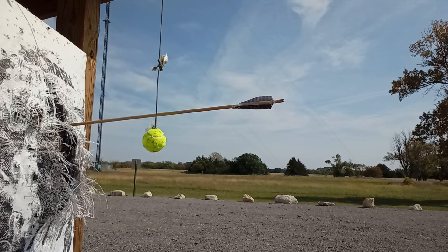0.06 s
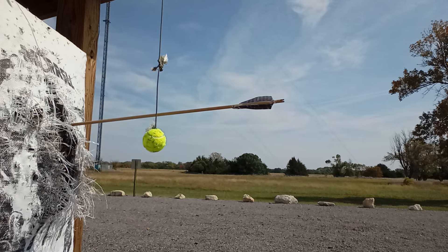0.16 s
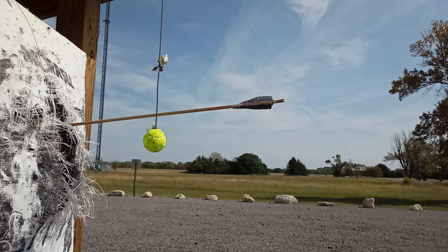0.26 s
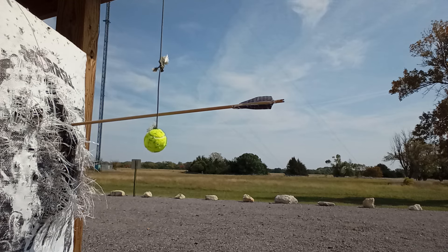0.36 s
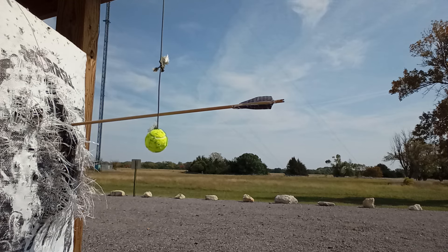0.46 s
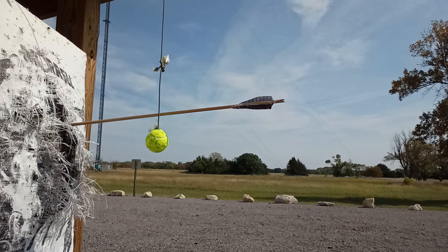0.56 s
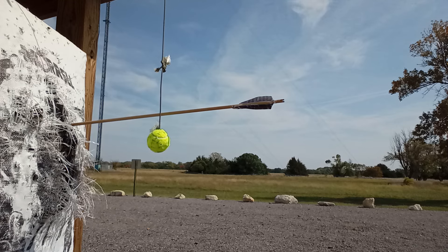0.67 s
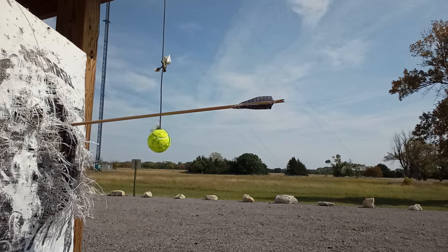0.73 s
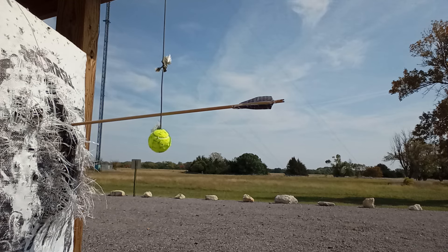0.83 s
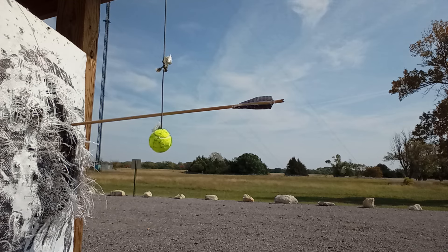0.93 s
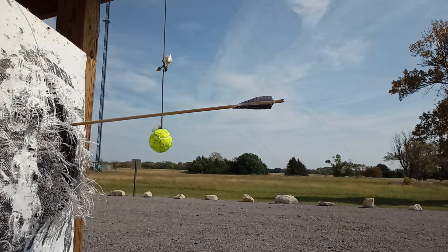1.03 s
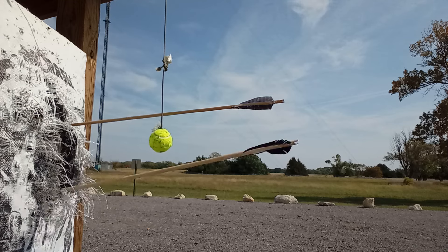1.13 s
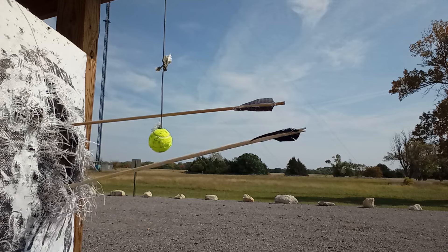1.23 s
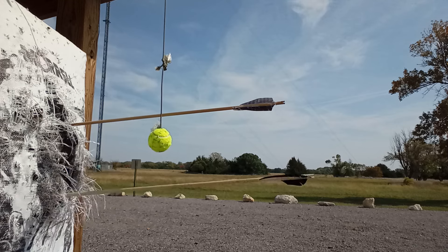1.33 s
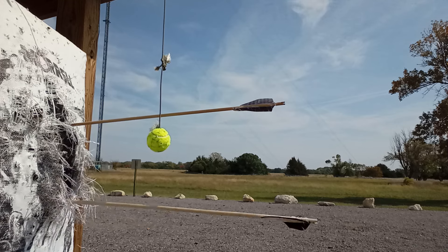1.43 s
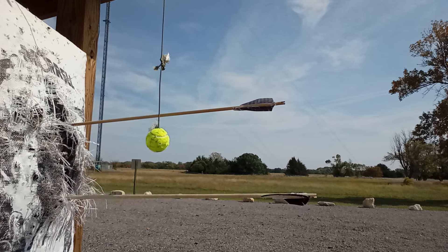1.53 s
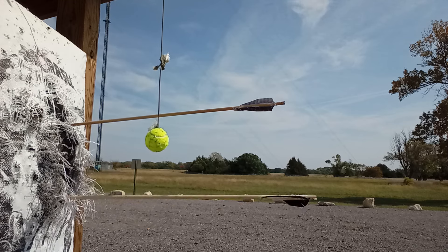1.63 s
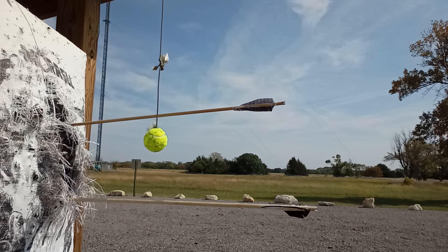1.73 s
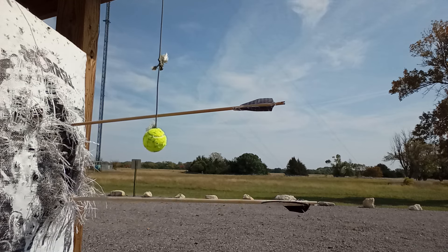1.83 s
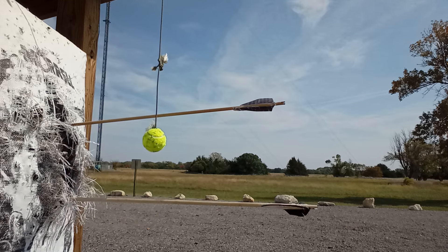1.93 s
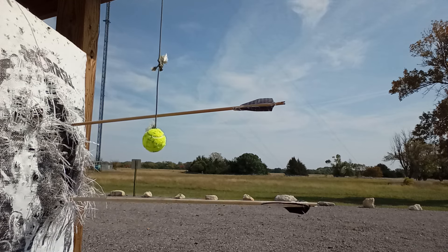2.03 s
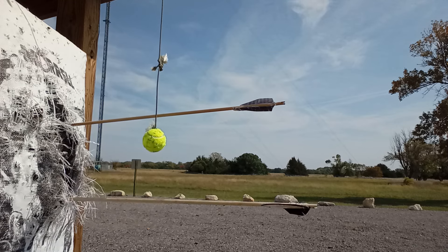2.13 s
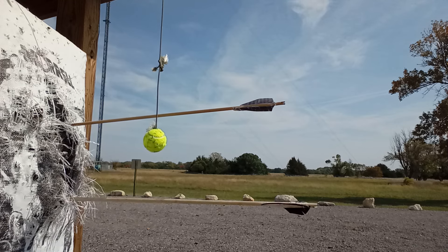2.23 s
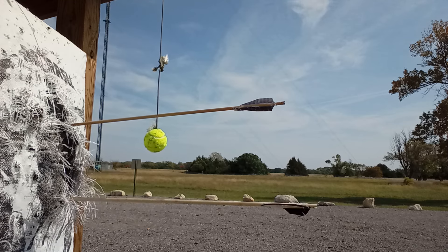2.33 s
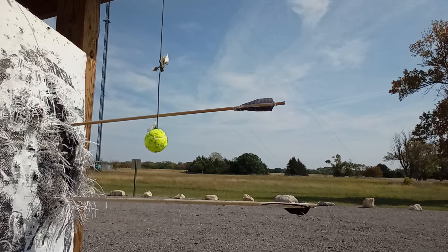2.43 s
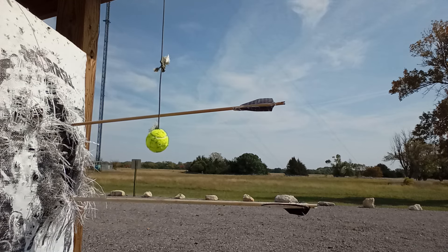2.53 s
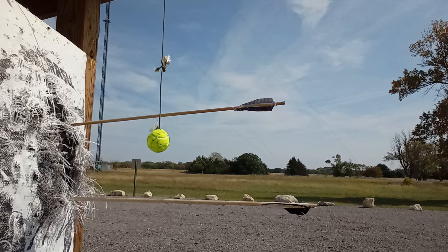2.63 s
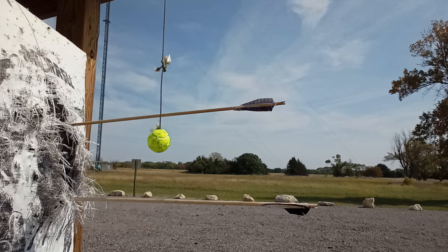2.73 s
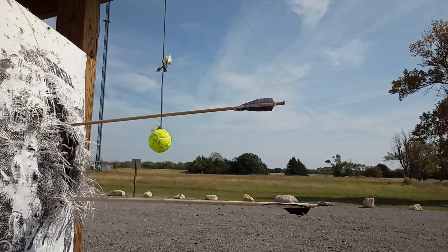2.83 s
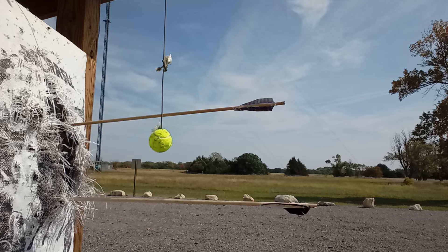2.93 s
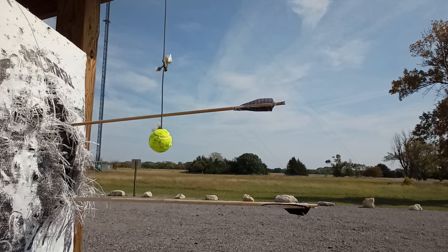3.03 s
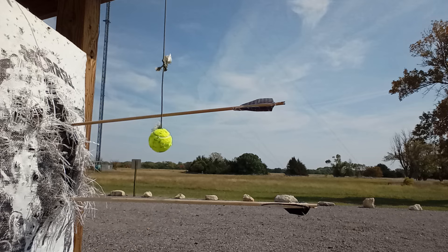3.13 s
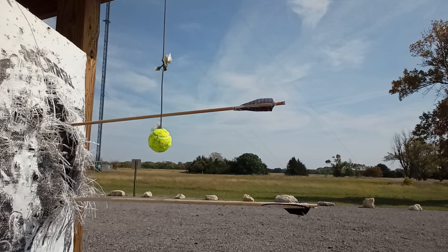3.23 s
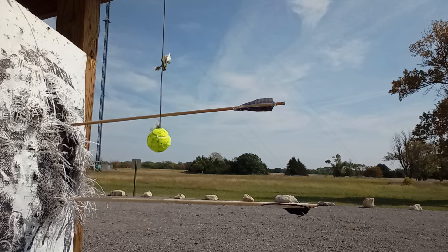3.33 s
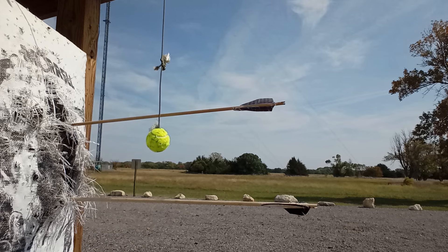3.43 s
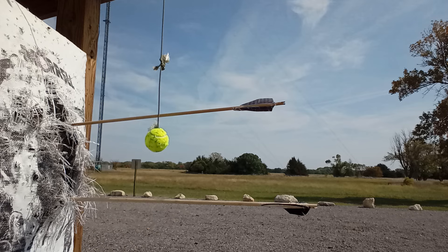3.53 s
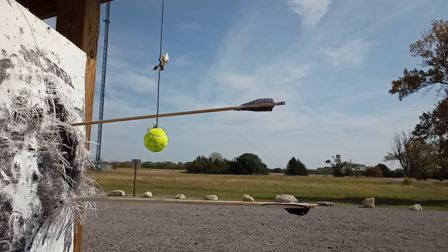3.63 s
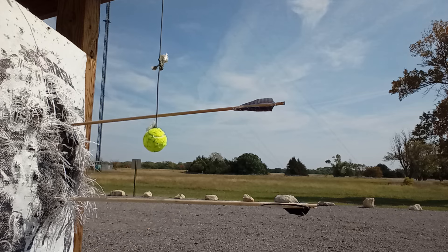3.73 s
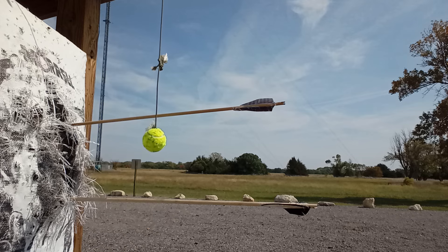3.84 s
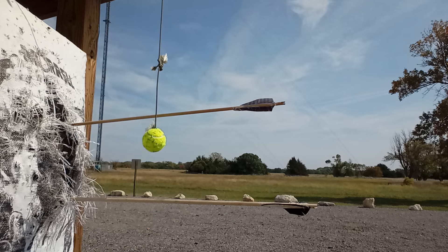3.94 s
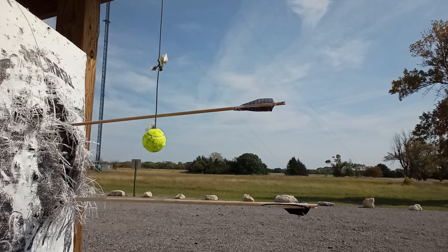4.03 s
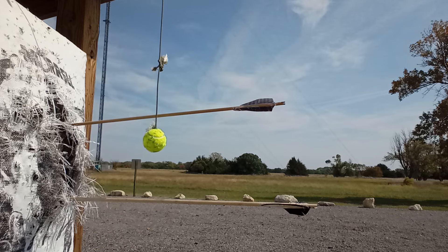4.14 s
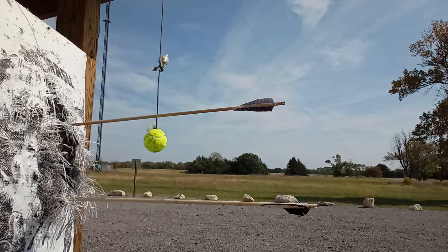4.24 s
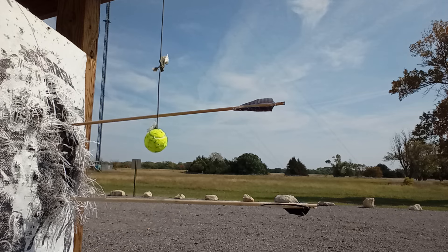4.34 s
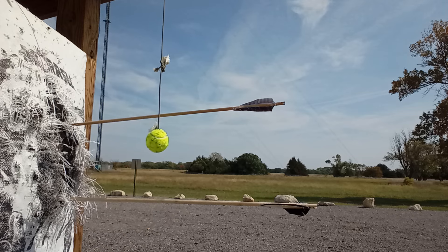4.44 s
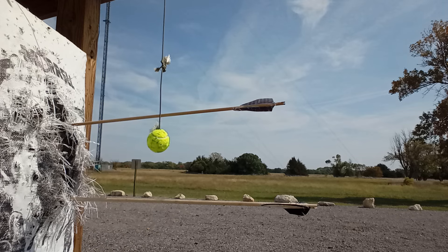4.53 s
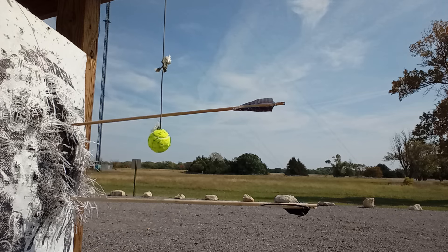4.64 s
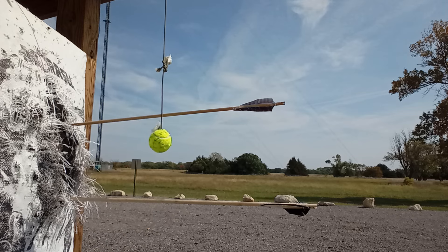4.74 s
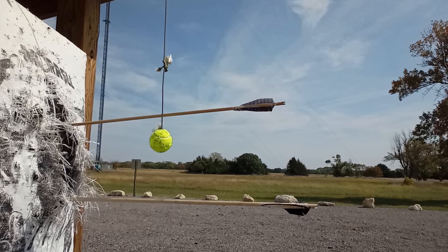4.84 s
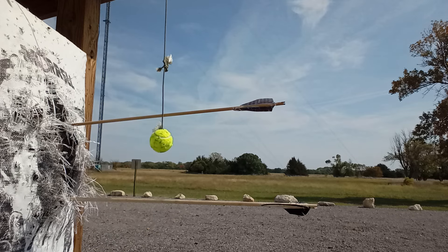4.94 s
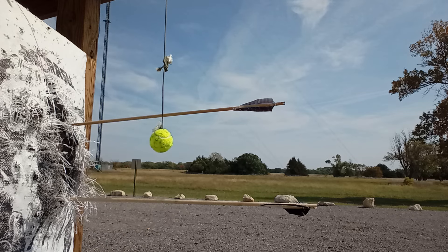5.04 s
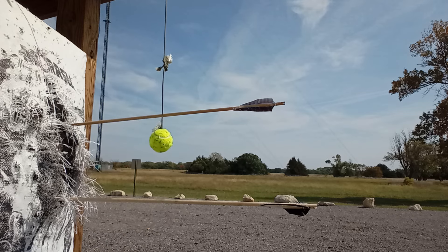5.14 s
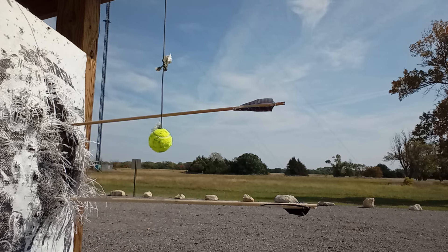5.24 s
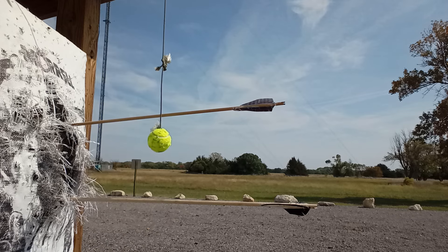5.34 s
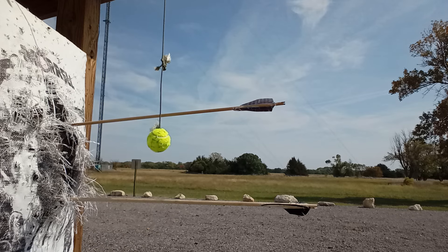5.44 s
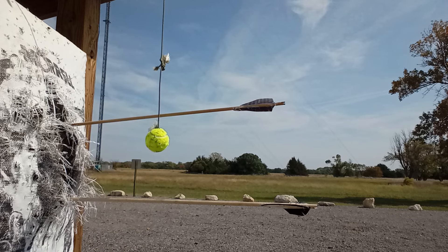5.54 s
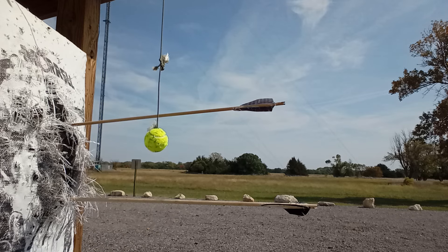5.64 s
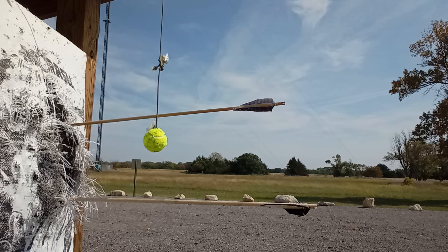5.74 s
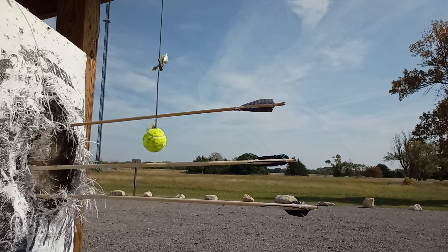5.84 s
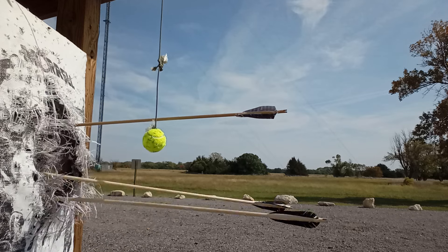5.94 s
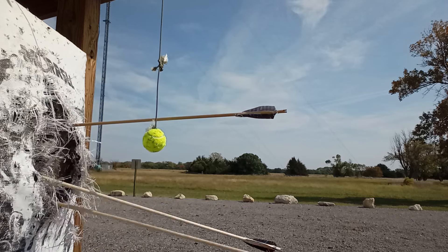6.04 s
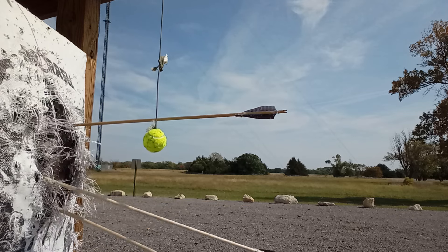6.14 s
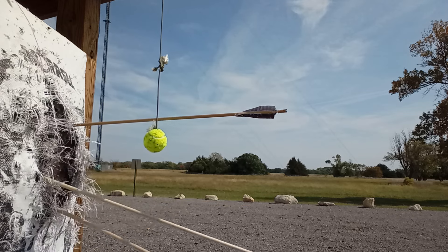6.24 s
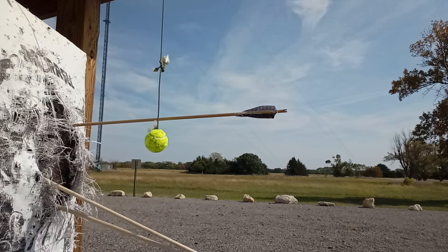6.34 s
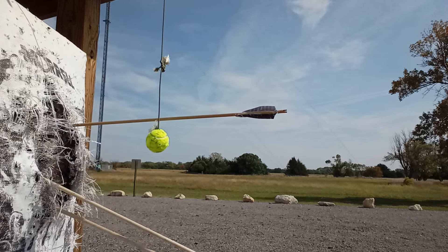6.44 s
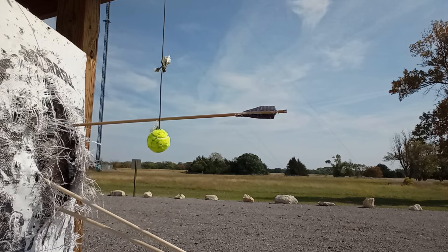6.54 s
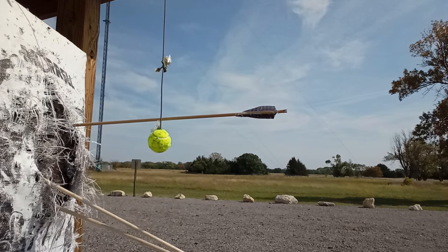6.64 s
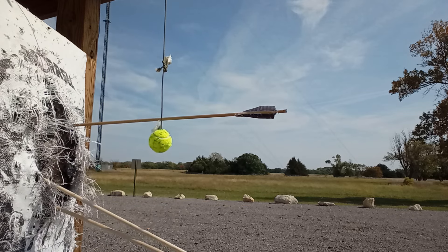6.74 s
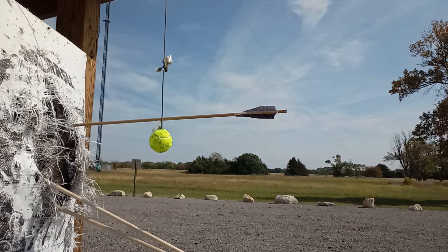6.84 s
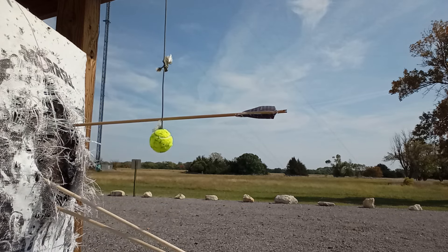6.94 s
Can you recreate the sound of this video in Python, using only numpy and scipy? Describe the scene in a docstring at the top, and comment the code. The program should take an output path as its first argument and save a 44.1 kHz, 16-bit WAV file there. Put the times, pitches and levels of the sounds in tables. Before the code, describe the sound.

A quiet open field with a low wavering aircraft drone, faint traffic and small birds whistling far off. A bowstring snaps at right; a quarter second later its arrow punches through fibres at left with a tight, dry thwack. After several calm seconds, marked only by a faint distant tap, another shot slaps, hisses and strikes louder and deeper, leaving a short woody rumble and light fibrous rustling. Two spaced microphones sit near the target.

```python
"""An open-air archery range, heard from beside the target by two spaced capsules.
Throughout, a receding propeller plane drones as tones on its blade rate, far traffic and the capsules' own hiss run
as banded noise and small birds call in gliding tones. Near 1 s a bow on the right slaps in ringing modes and noise,
the arrow hisses in, tears the face on the left and thuds into the bale, whose modes and fibres answer. Near 2.8 s
comes a small far knock, near 5.7 s a second shot, after which the torn fibres rub on."""
import sys
import numpy as np
from scipy import signal
from scipy.fft import rfft, irfft
from scipy.io import wavfile
from scipy.ndimage import uniform_filter1d

SR = 44100
rng = np.random.default_rng(int(sys.argv[2]) if len(sys.argv) > 2 else 0)


def unload_wav(signal):
    """Save mono or channel-first audio to the path in sys.argv[1] as 16-bit WAV at rate SR, clipped to [-1, 1]."""
    wavfile.write(
        sys.argv[1],
        SR,
        np.round(np.clip(np.atleast_2d(signal).T, -1, 1) * 32767).astype(np.int16),
    )


N = 307818

RIGHT_LAG, LEFT_LAG = 22, -12   # samples by which the left capsule hears each side later
# Housing shade for sound from the left. Each row: frequency in Hz, left minus right in dB.
SHADE_LEFT = [(700, 3), (2500, 0.5), (4000, -1), (6000, 2), (8500, 1), (12000, 3.5), (15500, 7.5)]
# Spectrum of rustling fibres, also of the knock's rasp. Each row: frequency in Hz, relative dB per Hz.
RUSTLE_COLOUR = [(500, 6.5), (1500, -10.5), (5000, -1), (7000, -8.5), (9000, -7), (16000, -16)]


def from_db(db):
    """Gain of a level."""
    return 10 ** (np.asarray(db) / 20)


def rms_one(x):
    """Scaled to unit rms."""
    return x / np.sqrt(np.mean(x ** 2) + 1e-20)


def in_time(rows):
    """Columns of a curve at every sample."""
    s, *columns = np.transpose(rows)
    return [np.interp(np.arange(N) / SR, s, c) for c in columns]


def level(rows):
    """Gain of a curve's last column, silent outside its span."""
    columns = np.transpose(rows)
    return from_db(np.interp(np.arange(N) / SR, columns[0], columns[-1], left=-200, right=-200))


def at_hz(points, hz):
    """Read a table on a log-frequency axis."""
    table_hz, value = np.array(points).T
    return np.interp(np.log(hz), np.log(table_hz), value)


def drift(rate_hz):
    """Random curve of rms 1: noise at SR / 40 through a double pole at rate_hz."""
    step = 40
    r = np.exp(-2 * np.pi * rate_hz * step / SR)
    white = rng.standard_normal(N // step + 2002)
    slow = rms_one(signal.lfilter([1], [1, -2 * r, r * r], white)[2000:])   # settled part
    return np.interp(np.arange(N) / step, np.arange(len(slow)), slow)


def decay(t60_s):
    """Factor per sample of a 60 dB fall in t60_s."""
    return from_db(-60 / (t60_s * SR))


def ring(push, hz, t60_s):
    """Damped mode: a unit click sets a cosine of height 1 ringing."""
    r, c = decay(t60_s), np.cos(2 * np.pi * hz / SR)
    return signal.lfilter([1, -r * c], [1, -2 * r * c, r * r], push + 1e-18)


def noise_hz():
    """Frequencies of the N-sample spectrum, kept above zero for the log axis."""
    return np.maximum(np.fft.rfftfreq(N, 1 / SR), 1)


def colour(x, spectrum):
    """Give white noise of rms 1 a spectrum, rms kept."""
    gain = from_db(at_hz(spectrum, noise_hz()))
    return irfft(rfft(x) * rms_one(gain), N)


def placed(x, lag, pan_db=0):
    """Two spaced capsules hear one source at different moments; pan_db is left minus right."""
    pair = np.array([np.roll(x, max(lag, 0)), np.roll(x, max(-lag, 0))])
    return pair * from_db([[pan_db / 2], [-pan_db / 2]])


def hiss(spectrum, lag, diffuse):
    """Coloured noise from one side, a share of its power independent per capsule, with the housing's shade."""
    # Housing shade for sound from the right. Each row: frequency in Hz, left minus right in dB.
    shade_right = [(700, 1.5), (1500, -1), (4000, -4.5), (8000, -6), (12000, -6.5), (15500, -10.5)]
    direct, *apart = rng.standard_normal((3, N))
    share = np.clip(diffuse, 0, 1)
    shade_db = at_hz(shade_right if lag > 0 else SHADE_LEFT, noise_hz())
    mixed = np.sqrt(1 - share) * placed(direct, lag) + np.sqrt(share) * np.array(apart)
    return irfft(rfft(colour(mixed, spectrum)) * from_db([shade_db / 2, -shade_db / 2]), N)


def bursts(events, t60_s):
    """Envelope of sudden starts that die exponentially."""
    starts = np.zeros(N)
    for s, db, *_ in events:
        starts[round(s * SR)] = from_db(db)
    return signal.lfilter([1], [1, -decay(t60_s)], starts + 1e-18)


def onrush(start, full, stop, db, t60_s):
    """Envelope that climbs ever faster, holds and dies."""
    t = np.arange(N) / SR
    rise = np.clip((t - start) / (full - start), 1e-9, 1)
    fall_db = 60.0 * np.clip(t - stop, 0, 1) / t60_s
    return (t > start) * from_db(db - 38 * (1 - rise ** 3.8) - fall_db)


def soft_push(ms):
    """A rounded push of unit area, centred 5 ms into half a second."""
    t = (np.arange(SR // 2) / SR - .005) * 1000 / ms
    push = (np.abs(t) < .5) * np.cos(np.pi * t) ** 2
    return push / push.sum()


def bow():
    """String slaps make clicks with rasps and strike low limb, riser and high modes; one echo follows."""
    # Slaps on the limbs. Each row: start in seconds, click onset level in dB, then limb, riser ring, rasp
    # and high ring, each in relative dB.
    slaps = [(0.9546, -53.5, -48.5, -61, -56, -53), (0.972, -39, -57, -52, -49, -55),
             (0.9766, -47, -50, -57, -51, -47.5), (0.9904, -45.5, -46.5, -55, -61, -60),
             (0.996, -58.5, -56, -62, -62, -64), (1.013, -64.5, -56, -56, -59, -66),
             (5.648, -69, -62, -70, -57, -63), (5.6673, -58, -59.5, -66, -52, -55),
             (5.6854, -43, -49, -68, -45, -45), (5.691, -50, -53, -71, -58, -47),
             (5.704, -52.5, -57.5, -57, -61, -62), (5.714, -58.5, -53.5, -64, -70, -66)]
    # Bow modes. Each row: frequency in Hz, relative level in dB, t60 in seconds.
    modes = [(264, -3.5, 0.11), (540, -15, 0.096), (686, -10, 0.046), (860, -11, .05), (1736, -3, 0.091),
             (1820, -12, .04), (2770, -13.5, 0.03), (3810, -5, .035), (4280, -2, 0.024), (4560, -3, 0.025),
             (5800, -7.5, .03)]
    # Click spectrum. Each row: frequency in Hz, relative dB per Hz.
    snap_colour = [(1500, -20), (4000, 4.5), (8000, 1), (12000, 3), (16000, -10)]
    # Rasp spectrum. Each row: frequency in Hz, relative dB per Hz.
    rasp_colour = [(2000, -12), (3200, -1), (3900, 0), (4600, 1), (6000, -6), (7500, -20), (12000, -40)]
    rasp_rise_s, rasp_t60_s = 0.004, 0.02
    shudder_db, shudder_t60_s = -33.5, 0.18   # the limbs shudder on, against the snap
    echo_s, echo_snap_db, echo_body_db = .065, -7, -10
    echo_low_cut_hz, echo_high_cut_hz = 9500, 900   # snaps return thinner, limbs duller

    shudder = from_db(shudder_db) * bursts(slaps, shudder_t60_s)
    at = [round(row[0] * SR) for row in slaps]
    body = np.zeros(N)
    for hz, db, t60_s in modes:
        column = 2 if hz < 1200 else 3 if hz < 2200 else 5
        spread_db = rng.normal(0, 1.5 if hz < 2200 else 4, len(at))
        clicks = np.zeros(N)
        clicks[at] = from_db(np.array(slaps)[:, column] + db + spread_db)
        if hz < 1200:
            clicks += from_db(db) * shudder * rng.standard_normal(N)
        contact = signal.windows.hann(round(SR / hz) + 3)   # a soft touch, about one period long
        push = signal.fftconvolve(clicks, 4 * contact / contact.sum())[:N]
        body += ring(push, hz, t60_s)

    snaps = bursts(slaps, 0.0058) * hiss(snap_colour, RIGHT_LAG, diffuse=0.37)
    rise = np.exp(-1 / (rasp_rise_s * SR))
    rasp = bursts([(row[0], row[4]) for row in slaps], rasp_t60_s)
    scrape = signal.lfilter([1 - rise], [1, -rise], rasp)
    snaps += 2 * scrape * from_db(1.23 * drift(180)) * hiss(rasp_colour, RIGHT_LAG, diffuse=0.74)

    thin = signal.lfilter(*signal.butter(1, echo_low_cut_hz, "high", fs=SR), snaps)
    dull = signal.lfilter(*signal.butter(2, echo_high_cut_hz, fs=SR), body)
    echo = from_db(echo_body_db) * placed(dull, RIGHT_LAG) + from_db(echo_snap_db) * thin
    return placed(body, RIGHT_LAG, pan_db=1.5) + snaps + np.roll(echo, round(echo_s * SR), axis=1)


def flight():
    """Air tears past the feathers: hiss swells to a peak at the loose, fades, grows again as the arrow nears."""
    # Each row: loudest moment of the hiss at the loose in seconds, arrival in seconds, hiss at the loose
    # and on arrival in relative dB.
    flights = [(0.962, 1.192, -58, -59.5), (5.684, 5.884, -55.5, -61.5)]
    # Hiss spectrum. Each row: frequency in Hz, relative dB per Hz.
    air_colour = [(400, -2.5), (2000, 0), (4500, 2), (8000, -4.5), (12000, -8), (16000, -8)]
    draw_s, far_db = .026, -66.5   # lead before the peak, floor after it
    swell_db_per_s, fade_db_per_s, near_db_per_s = 700, 352, 76
    ticks_per_s, tick_db, tick_t60_s = 34, 1.5, .015   # the feathers flick now and then

    t, envelope = np.arange(N) / SR, np.zeros(N)
    for peak, arrival, loose_db, near_db in flights:
        slope = np.where(t < peak, swell_db_per_s, fade_db_per_s)
        loose = loose_db - slope * np.abs(t - peak)
        near = near_db - near_db_per_s * np.abs(arrival - t)
        floor = np.where(t > peak, far_db, -200)
        audible = (t > peak - draw_s) * (t < arrival)
        envelope += audible * from_db(np.maximum(np.maximum(loose, near), floor))
    ticks = (rng.random(N) < ticks_per_s / SR) * from_db(tick_db) * rng.random(N)
    flicks = signal.lfilter([1], [1, -decay(tick_t60_s)], ticks)
    flutter = from_db(2.48 * drift(83)) + flicks
    return envelope * flutter * hiss(air_colour, RIGHT_LAG, diffuse=.45)


def tear():
    """Fibres break ever faster under the point until it stops; feathers and shaft hiss through them."""
    # Point tearing the face. Each row: start, full and stop in seconds, level in dB, t60 in seconds,
    # relative level of the dull part in dB.
    tears = [(1.183, 1.1900, 1.1958, -32.5, 0.025, -4), (5.882, 5.893, 5.896, -26, 0.034, 1)]
    # Feathers and shaft in the loose fibres. Each row: start, full and stop in seconds, level in dB,
    # t60 in seconds.
    sizzles = [(1.186, 1.1892, 1.1945, -34, 0.014), (5.885, 5.892, 5.899, -36, .03)]
    # Bright, dull and sizzle spectra. Each row: frequency in Hz, relative dB per Hz.
    bright_colour = [(1500, -2.5), (2400, -5), (3600, 0), (4400, -1.5), (5300, -3.5), (7000, -8),
                     (8500, -13.5), (12000, -12.5), (16000, -20.5)]
    dull_colour = [(300, -16), (600, -4.5), (1000, 4), (1400, 0), (2400, 0), (3500, -18)]
    sizzle_colour = [(6000, -30), (9500, -13), (12000, -6.5), (14000, -1), (16000, -0.5)]

    bright = sum(onrush(*row[:5]) for row in tears)
    dull = sum(onrush(*row[:5]) * from_db(row[5] - 5.5) for row in tears)
    top = sum(onrush(*row) for row in sizzles)
    noise = bright * hiss(bright_colour, LEFT_LAG, diffuse=0.73)
    noise += dull * hiss(dull_colour, LEFT_LAG, diffuse=0.23)
    noise += top * hiss(sizzle_colour, LEFT_LAG, diffuse=0.57)
    return from_db(2.1 * drift(300)) * noise


def cracks():
    """Single strands of the face snap with a short ring; the touch lasts under one period."""
    # Each row: time in seconds, relative level in dB, pitch in Hz, t60 in seconds.
    strands = [(1.187, -38.5, 15000, .006), (1.1903, -20, 3920, .008), (1.191, -31, 1760, .015),
               (1.1922, -23, 4200, .007), (1.1924, -28, 14300, .003), (1.1948, -19.5, 3330, .01),
               (1.1948, -29, 1900, .012), (1.1986, -31, 3900, .007), (5.8924, -23, 3840, .006),
               (5.8934, -13, 3700, .006), (5.8934, -22, 2400, .012), (5.8954, -20, 1680, .012),
               (5.898, -23, 4250, .008)]
    out = np.zeros((2, N))
    for s, db, hz, t60_s in strands:
        snap = np.zeros(N)
        touch = soft_push(750 / hz)   # 3/4 period
        snap[round((s - .005) * SR):][:SR // 2] = from_db(db) * ring(touch, hz, t60_s)
        out += placed(snap, LEFT_LAG, at_hz(SHADE_LEFT, hz))
    return out


def thud():
    """A soft push rings the bale's modes, another the shaft's; the small face radiates no deep bass."""
    # Jolts that brake the shaft. Each row: time in seconds, direction as a sign, relative level in dB, pitch
    # in Hz, t60 in seconds, overtone tilt in dB per octave, contact in ms, relative shaft level in dB,
    # shaft t60 in seconds.
    jolts = [(1.1909, -1, -30, 298, 0.016, -14, 1.4, -51.5, .014),
             (1.1927, 1, -21.5, 222, 0.022, 0, 1.6, -23, .012),
             (1.1965, 1, -17.5, 255, 0.024, 5, 1.4, -18, .014),
             (1.2003, 1, -32, 310, .025, 6, 1.4, -24, .016),
             (1.2067, 1, -34, 289.7, .025, -4, 1.8, -43, .025),
             (5.8945, -1, -21.5, 283, 0.017, -5, 2.1, -21.5, .01),
             (5.8964, 1, -6.5, 206, 0.026, 0.5, 2.5, -13, .011),
             (5.901, 1, -14, 201, 0.016, 3, 1.87, -23, .02),
             (5.9084, -1, -25, 173, 0.072, -0.5, 2.5, -41, .03)]
    # Bale modes, on a pitch of its own each time. Each row: pitch ratio, relative level in dB, t60 ratio.
    bale_modes = [(.66, -19, 2.4), (1, 7, 0.79), (1.7, -15, 1.8), (2.05, -8.5, 0.67)]
    # Shaft modes, fixed. Each row: frequency in Hz, relative level in dB, t60 ratio.
    shaft_modes = [(815, -6, 1.1), (1040, -3.5, .95), (1298, -8, 0.6)]
    shaft_contact_ms, shaft_lag, shaft_pan_db = .95, -14, 1.5

    bale, shaft = np.zeros((2, N))
    for s, direction, db, hz, t60_s, tilt_db, ms, shaft_db, shaft_t60_s in jolts:
        start = round((s - .005) * SR)
        at = slice(start, start + SR // 2)
        sign = np.sign(direction)
        for ratio, mode_db, life in bale_modes:
            gain = from_db(db + mode_db + tilt_db * np.log2(max(ratio, 1)))
            bale[at] += sign * gain * ring(soft_push(ms), hz * ratio, t60_s * life)
        for mode_hz, mode_db, life in shaft_modes:
            gain = from_db(shaft_db + mode_db)
            shaft[at] += sign * gain * ring(soft_push(shaft_contact_ms), mode_hz, shaft_t60_s * life)
    both = placed(bale, LEFT_LAG - 2, pan_db=0.5) + placed(shaft, shaft_lag, shaft_pan_db)
    return signal.lfilter(*signal.butter(3, 80, "high", fs=SR), both)


def frame():
    """The wooden frame rumbles on: dull noise that dies away after each hit."""
    # Each row: start in seconds, level in dB, t60 in seconds.
    rumbles = [(1.2, -50.5, 0.1), (1.25, -57, 0.5), (5.907, -42.5, .12), (5.955, -51.5, 0.34)]
    # Rumble spectrum. Each row: frequency in Hz, relative dB per Hz.
    rumble_colour = [(120, -14.5), (250, 4.5), (450, 1), (800, -12), (1500, -34.5)]
    envelope = sum(bursts([row], row[2]) for row in rumbles)
    return envelope * hiss(rumble_colour, LEFT_LAG, diffuse=0.24)


def rustle():
    """The torn face settles round the shaft with a few lone crackles; fibres rub as the shafts sag."""
    # Each row: start in seconds, relative level in dB, hold in seconds, relative lingering level in dB,
    # lingering in seconds.
    settlings = [(1.198, -50, 0.041, -78.5, 0.29), (5.908, -50.5, 0.065, -78, .14)]
    # Lone crackles. Each row: time in seconds, relative level in dB.
    crackles = [(6.122, -59), (6.1594, -65), (6.2316, -55), (6.3024, -66), (6.3744, -62), (6.619, -65)]
    # Rubbing. Each row: time in seconds, level in dB.
    sag = [(6.0, -80), (6.05, -78.5), (6.2, -76.5), (6.24, -75), (6.28, -77), (6.33, -73), (6.43, -77),
           (6.45, -81.5), (6.67, -83), (6.76, -77), (6.85, -100)]
    # Rubbing spectrum. Each row: frequency in Hz, relative dB per Hz.
    sag_colour = [(3000, -6.5), (7000, -7.5), (8800, -13), (10500, -3.5), (13000, -15), (15500, -11)]
    hold_db_per_s, release_db_per_s = 118, 540   # fall from the start; added after the hold

    t, settle = np.arange(N) / SR, np.zeros(N)
    for s, db, hold_s, linger_db, linger_s in settlings:
        fall = db - hold_db_per_s * np.abs(t - s)
        fall -= release_db_per_s * np.maximum(t - s - hold_s, 0)
        settle += (t > s) * (t < s + linger_s) * from_db(np.maximum(fall, linger_db))
    envelope = settle * from_db(1.0 + 2.1 * drift(52.3)) + from_db(-7.0) * bursts(crackles, 0.014)
    rub = level(sag) * from_db(2.1 * drift(40)) * hiss(sag_colour, LEFT_LAG, diffuse=0.67)
    return envelope * hiss(RUSTLE_COLOUR, LEFT_LAG, diffuse=0.38) + rub


def plane():
    """Blade-rate tone and its multiples; the air makes the weak ones flutter."""
    # Blade rate of the receding plane. Each row: time in seconds, frequency in Hz.
    blade_hz = [(0.0, 94.7), (0.7, 93.8), (2.79, 89.2), (4.19, 87.3), (4.89, 87.9), (5.58, 86.3),
                (6.28, 85.7), (6.98, 86.0)]
    # Blade-rate tone, swelling with the air. Each row: time in seconds, level in dB.
    blade_level = [(0.0, -48.5), (0.11, -45), (0.47, -44.5), (0.49, -45.5), (0.7, -42.5), (1.01, -52.5),
                   (1.16, -45), (1.2, -51), (1.28, -43), (2.21, -41.5), (2.45, -48.5), (2.7, -45),
                   (2.8, -54.5), (2.99, -42.5), (3.24, -40.5), (3.32, -45), (3.4, -43.5), (3.73, -51.5),
                   (3.83, -46.5), (4.24, -43.5), (4.61, -44.5), (4.82, -41), (5.05, -42.5), (5.17, -46.5),
                   (5.25, -43), (5.87, -45.5), (5.89, -50.5), (6.03, -47.5), (6.67, -48), (6.98, -50.5)]
    # The tone dips briefly. Each row: time in seconds, change in dB.
    dips = [(.495, -5), (.85, -5.5), (1.05, -7), (1.77, -2), (2.56, -3), (2.62, -5), (3.305, -6),
            (3.51, -4), (3.55, -5), (4.02, -9), (5.155, -7), (5.45, -6.5), (6.13, -5), (6.25, -5),
            (6.31, -4), (6.53, -6), (6.78, -6), (6.9, -6)]
    # Overtones. Each row: time in seconds, 2nd multiple in dB, 3rd multiple in dB.
    overtones = [(0, -66.5, -89), (1, -63.5, -63.5), (2, -67, -69), (3, -67, -66.5), (4, -66, -66),
                 (5, -61.5, -63.5), (6, -60.5, -72), (6.98, -64, -65.5)]
    # Further orders. Each row: multiple of the blade rate, level in dB.
    orders = [(1.5, -81), (2.5, -72), (4, -80), (5, -83)]
    # Rough bands. Each row: time in seconds, band round the 5th-6th multiple in dB, round the 8th in dB.
    growl = [(0.0, -68.5, -80), (0.4, -85.5, -78), (0.95, -78, -88), (1.7, -85.5, -73), (2.23, -74, -81.5),
             (2.64, -83, -73.5), (2.99, -66, -78.5), (3.2, -69.5, -66), (3.34, -70.5, -65),
             (3.65, -76, -75), (3.85, -79.5, -70), (4.15, -80.5, -72.5), (4.41, -80, -77.5),
             (4.8, -83.5, -64), (4.98, -83.5, -79), (5.33, -81, -64.5), (5.8, -79, -87),
             (6.35, -77.5, -65.5), (6.7, -84, -81), (6.98, -68.5, -70)]
    dip_fall_s, dip_back_s = 0.0079, 0.033

    t = np.arange(N) / SR
    second_db, third_db = in_time(overtones)
    low_db, high_db = in_time(growl)
    phase = 2 * np.pi * np.cumsum(in_time(blade_hz)[0]) / SR + 0.24 * drift(2.5)
    dip_db = sum(np.interp(t, [s - dip_fall_s, s, s + dip_back_s], [0, db, 0]) for s, db in dips)
    out = level(blade_level) * from_db(dip_db + 0.94 * drift(26)) * np.sin(phase)
    out += from_db(second_db + 3.0 * drift(3.5)) * np.sin(2 * phase + 0.29 * drift(4.1))
    out += from_db(third_db + 1.5 * drift(8)) * np.sin(3 * phase + .3 * drift(10))
    for k, db in orders:
        out += from_db(db + drift(1.3)) * np.sin(k * phase + 0.45 * k * drift(14))
    for k, db, width_hz in ((5.4, low_db, 160), (8.2, high_db, 29)):
        # random sidebands turn a line into a band
        band = drift(width_hz) * np.sin(k * phase) + drift(width_hz) * np.cos(k * phase)
        out += from_db(db) * band / np.sqrt(2)
    return placed(np.sqrt(2) * out, RIGHT_LAG - 4, pan_db=0.14)   # sqrt(2): sine levels are rms


def birds():
    """Near-sine notes from far trees glide to a turning pitch and on; buzzy ones are chopped by a throb."""
    # Each row: start in seconds, length in seconds, first, turning and last pitch in Hz, turn as share of
    # length, relative level in dB, buzz from 0 to 1.
    notes = [(0.0, 0.092, 7500, 6400, 7500, 0.3, -67, 0), (0.066, 0.046, 7600, 7620, 7400, 0.33, -68, 0),
             (0.62, 0.062, 7600, 7600, 7850, 0.42, -90, 0),
             (0.704, 0.069, 4500, 5200, 5110, 0.49, -69.5, 0.1), (0.79, 0.12, 7460, 7200, 7260, .2, -74, 0),
             (1.406, 0.19, 8340, 8430, 8970, 0.31, -78, 0.2),
             (2.082, .19, 8950, 8960, 8860, .45, -89.5, .7), (2.22, 0.11, 7480, 7230, 7440, 0.24, -72.5, 0),
             (2.318, 0.069, 4450, 5330, 5320, 0.4, -69, 0.06),
             (2.375, 0.033, 7550, 7500, 7500, .45, -77.5, 0),
             (2.385, 0.12, 7650, 6620, 6620, 0.25, -71.5, 0),
             (2.56, 0.072, 7080, 6670, 5890, 0.32, -80, 0.7), (3.032, 0.13, 9150, 8200, 7050, .5, -95.5, 0),
             (3.713, .11, 8550, 8000, 6500, .4, -99, 0.06), (3.802, 0.11, 6100, 6680, 5360, 0.28, -82.5, 0),
             (4.224, 0.036, 3400, 3400, 3330, 0.41, -78, 0.17),
             (4.39, 0.053, 3950, 4050, 4150, .45, -80, .4), (4.464, 0.08, 3900, 3750, 3600, .45, -83, .6),
             (4.205, 0.054, 4120, 4150, 4200, .45, -77.5, 0.3),
             (4.29, 0.028, 3970, 3900, 3900, .45, -63, 0.1),
             (4.322, 0.047, 3880, 3960, 3930, .45, -70.5, 0.1),
             (4.364, 0.033, 3950, 3910, 3970, 0.5, -65, 0.04),
             (4.445, 0.16, 8650, 7800, 7150, 0.31, -88.5, 0),
             (4.484, 0.071, 6000, 5990, 6030, 0.32, -73.5, 0),
             (4.6, 0.082, 3500, 3470, 3530, 0.34, -78, .4), (4.642, 0.05, 5560, 5470, 5400, 0.46, -75, 0),
             (4.727, 0.055, 4270, 4330, 4300, 0.56, -74, 0), (4.79, 0.05, 4330, 4330, 4200, 0.41, -83, 0.1),
             (5.308, 0.092, 6950, 6800, 5700, 0.55, -86, 0.01),
             (5.435, .035, 5600, 5610, 5700, .45, -80, 0), (5.577, 0.11, 4840, 5300, 5260, 0.3, -76, 0),
             (5.828, 0.072, 4600, 4400, 4420, 0.37, -72, 0.08),
             (5.97, 0.077, 4200, 3850, 3750, 0.4, -75, 0.6), (6.235, .05, 7900, 7700, 7650, .45, -85, .5),
             (6.23, 0.047, 6100, 6100, 6000, .45, -83, .8), (6.05, 0.11, 6740, 6780, 6620, .25, -79, 1),
             (6.04, 0.2, 3920, 3800, 3720, 0.4, -82, 0.6), (6.106, 0.084, 4500, 4650, 4500, .4, -73, 0.1),
             (6.188, 0.039, 4780, 4800, 5000, .4, -76, 0.1), (6.23, .045, 5500, 5450, 5300, 0.51, -81, .4),
             (6.271, 0.067, 7000, 6900, 6850, 0.44, -80, 1), (6.305, 0.092, 6330, 6190, 6180, .3, -73, 1),
             (6.399, 0.048, 4350, 4530, 4450, 0.38, -79, 0.1),
             (6.402, 0.045, 5400, 5250, 5200, .45, -84, .3), (6.578, .06, 4790, 4814, 4900, 1, -74.5, 0.1)]
    attack_s, release_s, buzz_hz = 0.013, 0.024, 150
    blur_t60_s, blur_db = 0.061, -4.5   # foliage smears each note

    song, waver_hz = np.zeros(N), 35 * drift(88)
    flicker = np.sqrt(2) * from_db(2.3 * drift(33))
    for s, length, first_hz, turn_hz, last_hz, turn, db, buzz in notes:
        t = np.arange(round(length * SR)) / SR
        at = slice(round(s * SR), round(s * SR) + len(t))
        glide = np.interp(t / length, [0, np.clip(turn, .05, .95), 1], [first_hz, turn_hz, last_hz])
        hz = uniform_filter1d(glide, size=400, mode="nearest") + waver_hz[at]
        envelope = np.clip(np.minimum(t / attack_s, (length - t) / release_s), 0, 1) ** 2
        throb = 1 + np.clip(buzz, 0, 1) * np.sign(np.sin(2 * np.pi * buzz_hz * t))
        song[at] += from_db(db) * envelope * throb * np.sin(2 * np.pi * np.cumsum(hz) / SR)
    n = SR // 10
    smear = rng.standard_normal(n) * from_db(-60 * np.arange(n) / SR / blur_t60_s)
    song += from_db(blur_db) * signal.fftconvolve(song, smear / np.linalg.norm(smear))[:N]
    # leaves scatter the notes unevenly to each side
    return placed(flicker * song, 2) * from_db([1.5 * drift(3), 1.5 * drift(3)])


def knock():
    """A far tap on something small and hard that rattles on a little and comes back once."""
    # One event: time in seconds, modes (frequency in Hz, relative level in dB, t60 in seconds), rasp in dB.
    s, modes, rasp_db = (2.781, [(1920, -58, 0.022), (3760, -60.5, 0.014), (5700, -63, 0.007)], -68)
    tail_db, echo_s, echo_db = -23, 0.043, -8

    tap = from_db(tail_db) * bursts([(s, 0)], 0.08) * rng.standard_normal(N)
    tap[round(s * SR):][:7] += np.hanning(7) / 2   # a soft touch
    body = sum(from_db(db) * ring(tap, hz, t60_s) for hz, db, t60_s in modes)
    rasp = bursts([(s, rasp_db)], 0.015) * hiss(RUSTLE_COLOUR, RIGHT_LAG, diffuse=.5)
    near = placed(body, RIGHT_LAG) + rasp
    return near + from_db(echo_db) * np.roll(near, round(echo_s * SR), axis=1)


def rush(patchy_db):
    """Far traffic, with the capsules' own hiss on top: flickering third-octave noise bands, partly diffuse."""
    # Spectrum. Each row: frequency in Hz, relative level in dB.
    band_level = [(25, -8.5), (42, -18), (55, -8.5), (70, 8), (115, 5), (190, -4.5), (280, -10.5),
                  (350, -11.5), (520, -16), (800, -4.5), (1300, -10), (2000, -12.5), (3500, -20),
                  (6500, -35), (9000, -45.5), (13000, -46), (16000, -43.5)]
    # Overall level. Each row: time in seconds, level in dB.
    rush_level = [(0.0, -59), (6.98, -61)]
    # Each row: frequency in Hz, share of power that differs between the capsules.
    diffuse = [(60, 0.23), (300, 0.34), (1000, 0.47), (3000, 0.6), (8000, 1)]

    out, together = 0, drift(1.5)
    edges_hz = 22 * 2 ** (np.arange(30) / 3)
    white = rng.standard_normal((2, 3, N))   # neighbouring bands take different noise
    for k, (low, high) in enumerate(zip(edges_hz, edges_hz[1:])):
        band = signal.butter(3, [low, high], "band", fs=SR, output="sos")
        direct, *apart = signal.sosfilt(band, white[k % 2])
        hz = np.sqrt(low * high)
        share = np.clip(at_hz(diffuse, hz), 0, 1)
        gain = from_db(at_hz(band_level, hz) + patchy_db * (0.21 * together + drift(5.9)))
        mixed = np.sqrt(1 - share) * placed(direct, RIGHT_LAG) + np.sqrt(share) * np.array(apart)
        out = out + gain * mixed
    return rms_one(out) * level(rush_level)


def scene():
    """Everything the two capsules hear, with their own hiss."""
    shots = bow() + flight() + tear() + cracks() + thud() + frame() + rustle()
    return shots + plane() + birds() + knock() + rush(patchy_db=2.0)


def record(dry):
    """The capsule port resonates near the top; above it the band is cut."""
    cutoff_hz = 15900
    port = signal.lfilter(*signal.iirpeak(15200, 12.0, fs=SR), dry)
    low_pass = signal.cheby2(14, 60, cutoff_hz + 400, fs=SR, output="sos")   # stop band edge
    return signal.sosfilt(low_pass, dry + 2.2 * port)


dry = scene()
out = record(dry)
unload_wav(out)
```